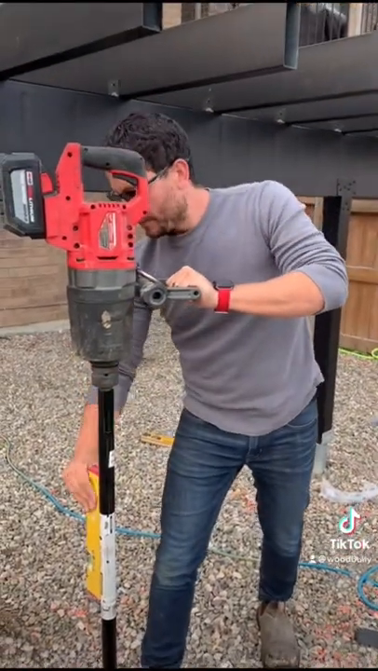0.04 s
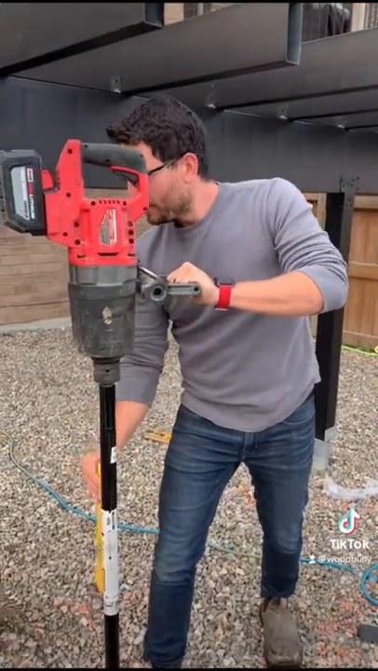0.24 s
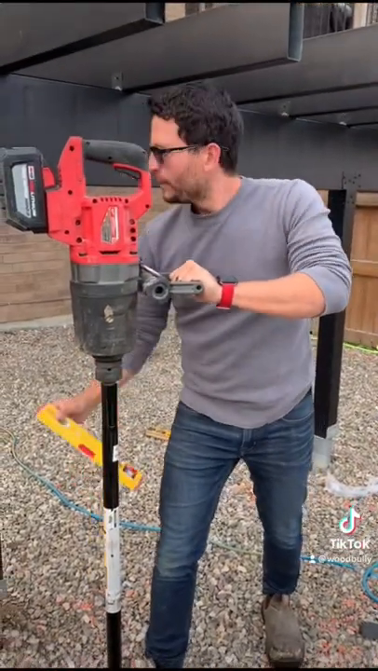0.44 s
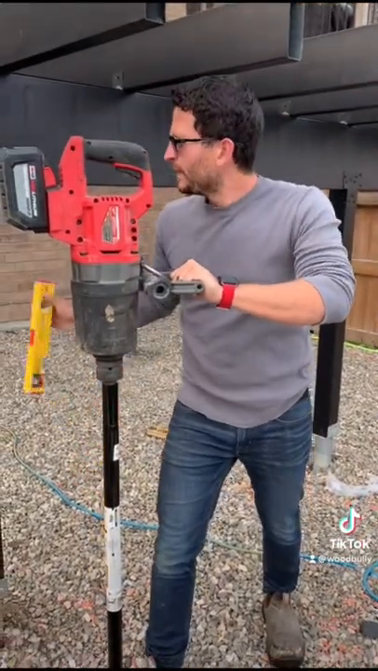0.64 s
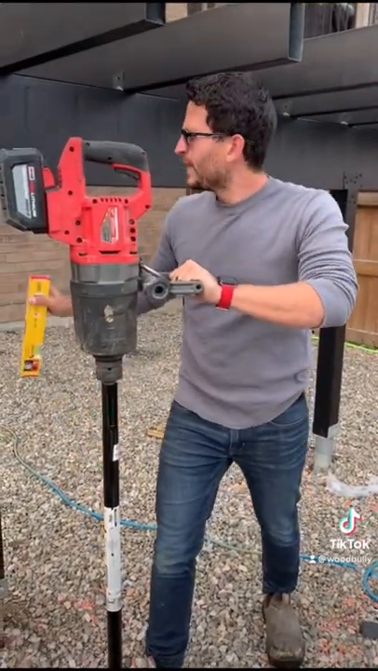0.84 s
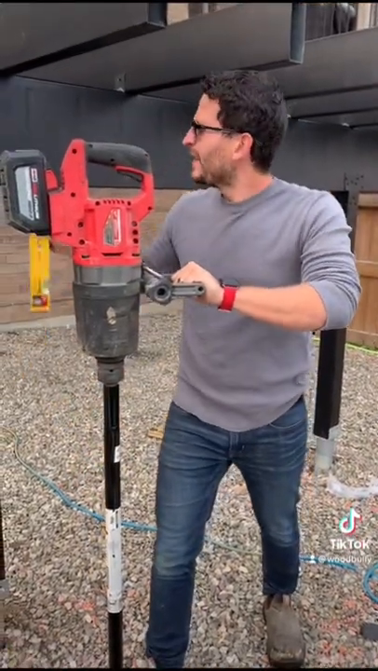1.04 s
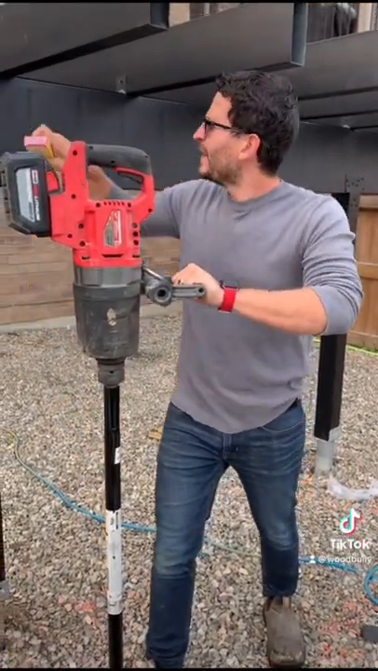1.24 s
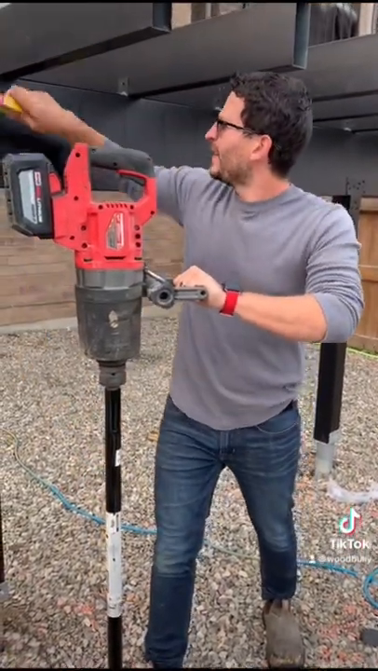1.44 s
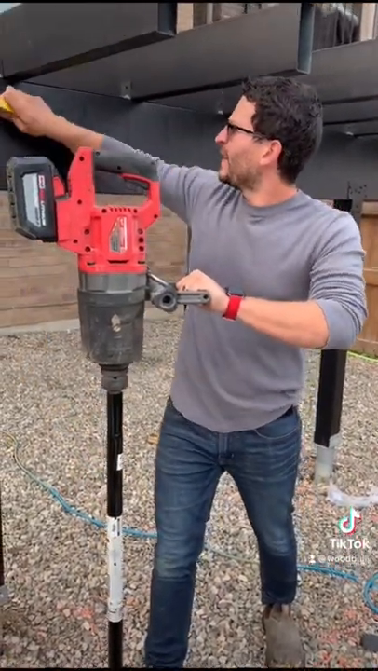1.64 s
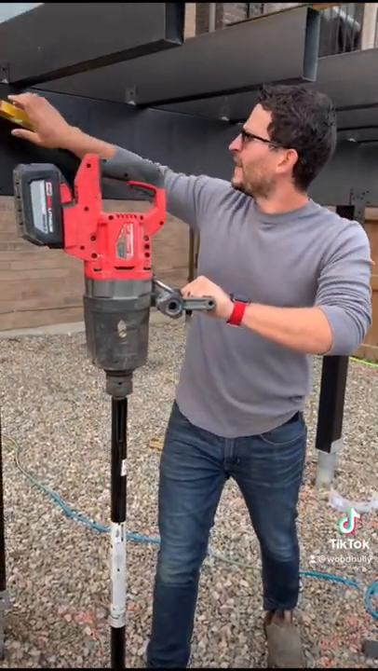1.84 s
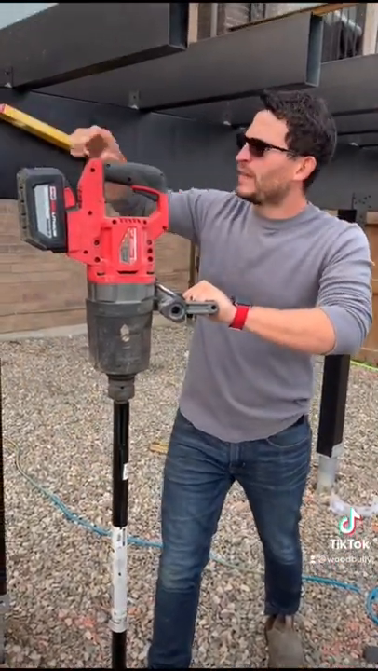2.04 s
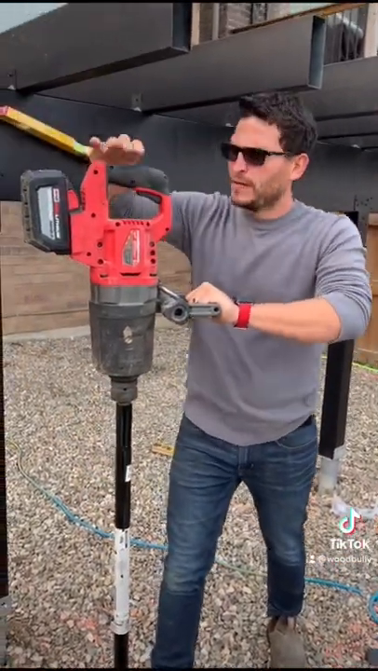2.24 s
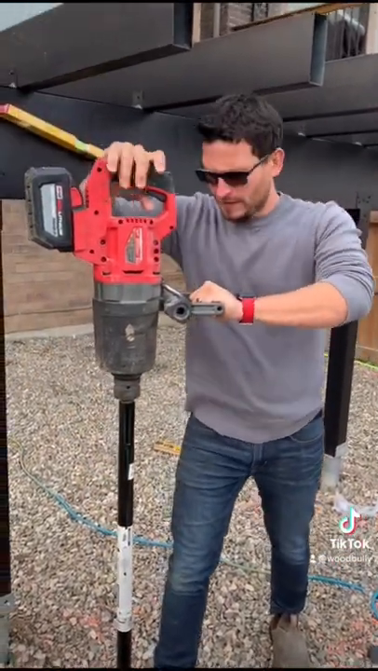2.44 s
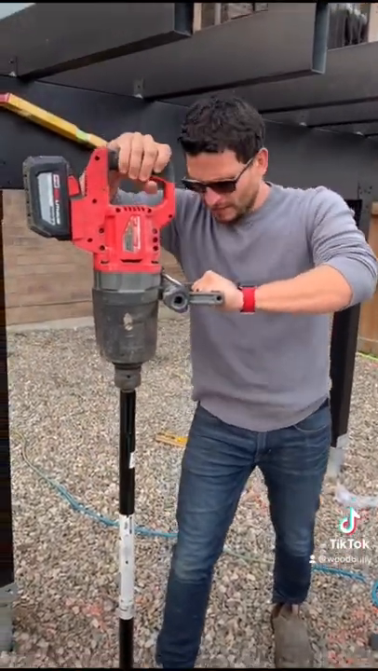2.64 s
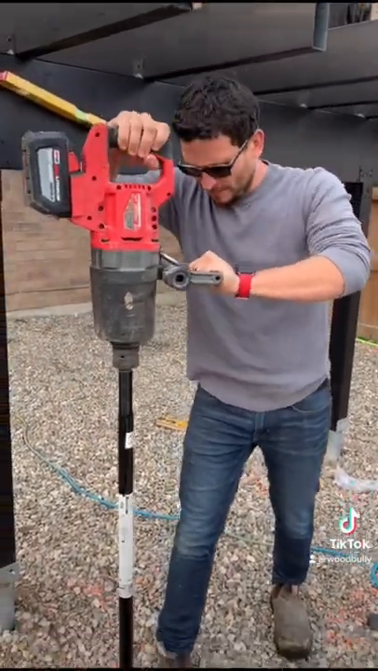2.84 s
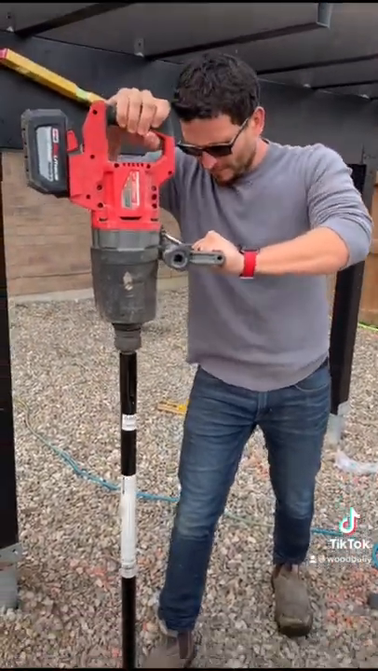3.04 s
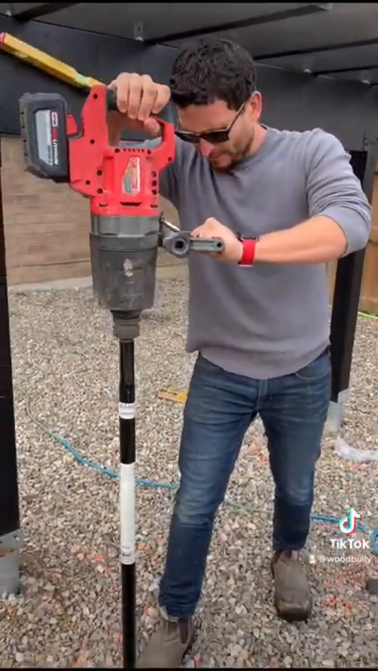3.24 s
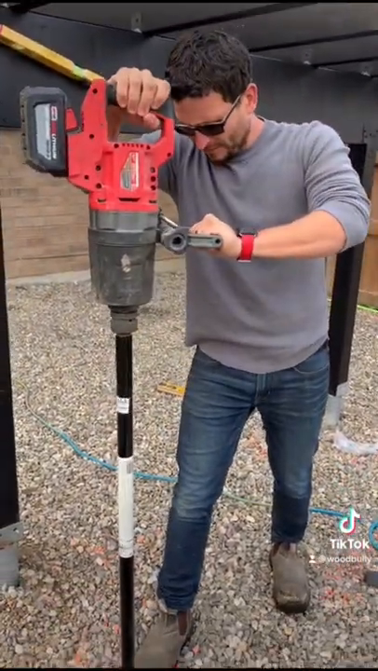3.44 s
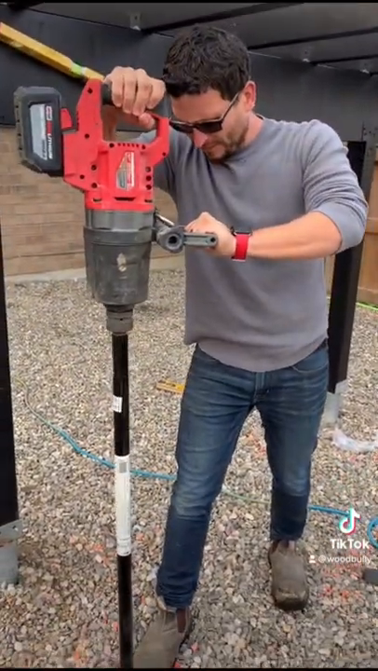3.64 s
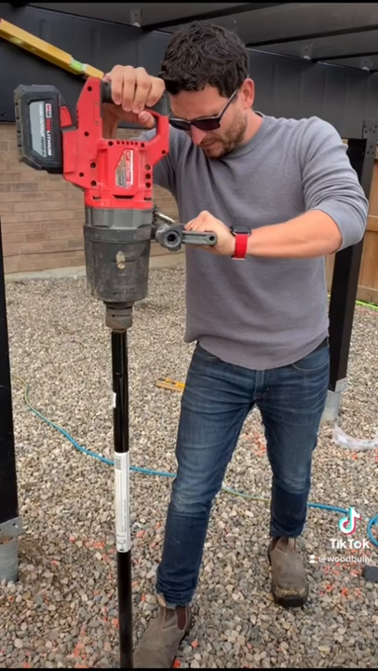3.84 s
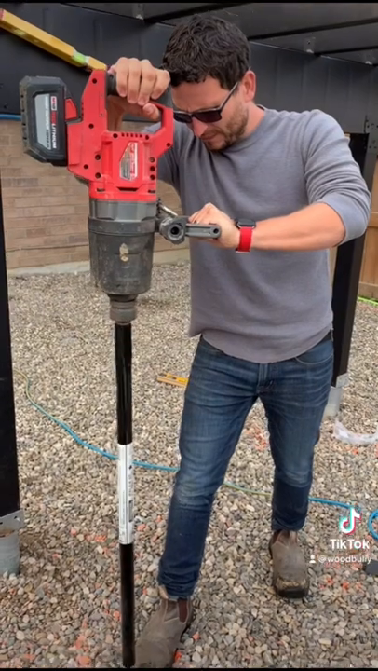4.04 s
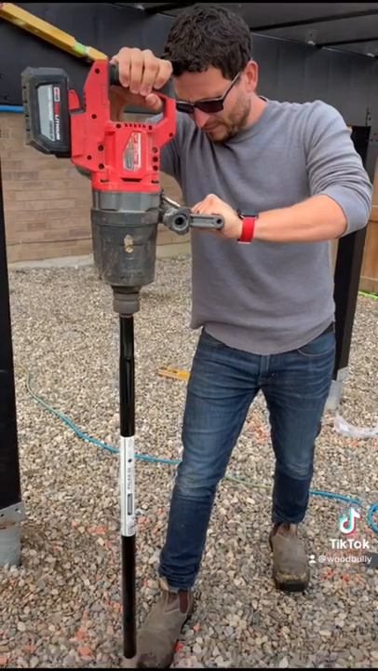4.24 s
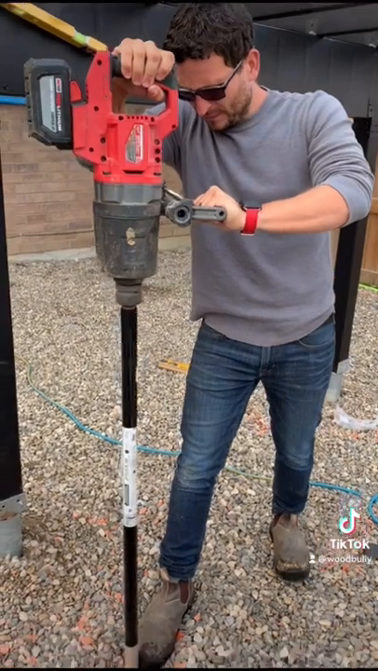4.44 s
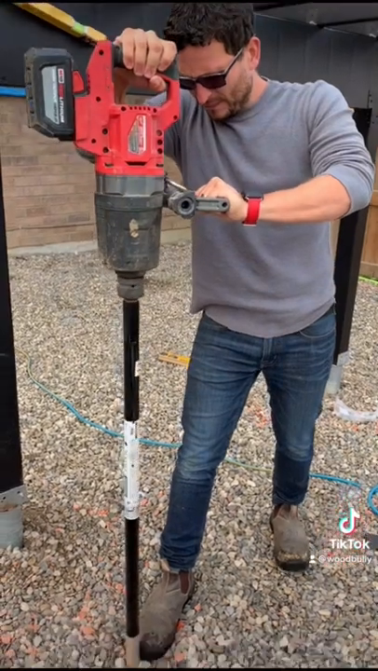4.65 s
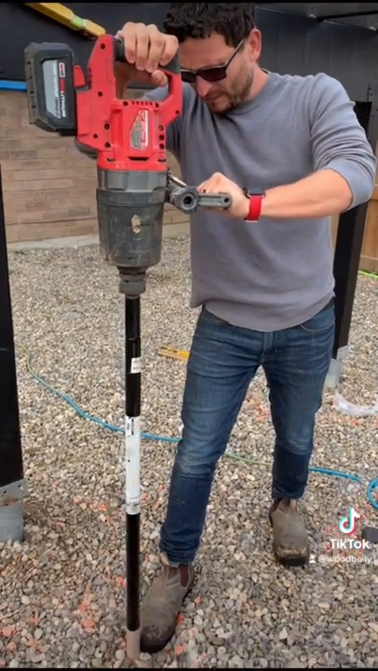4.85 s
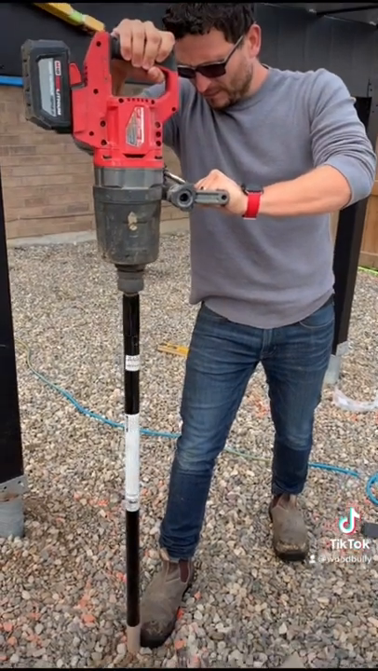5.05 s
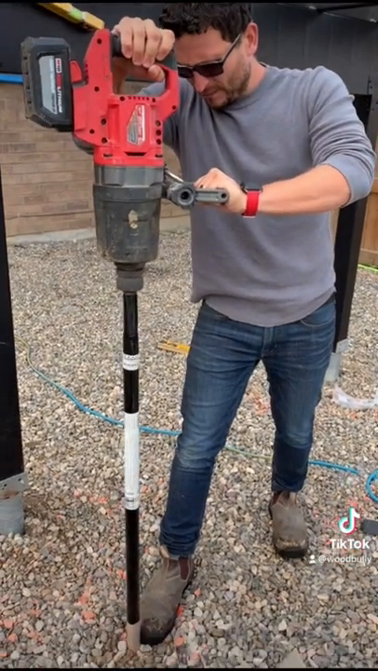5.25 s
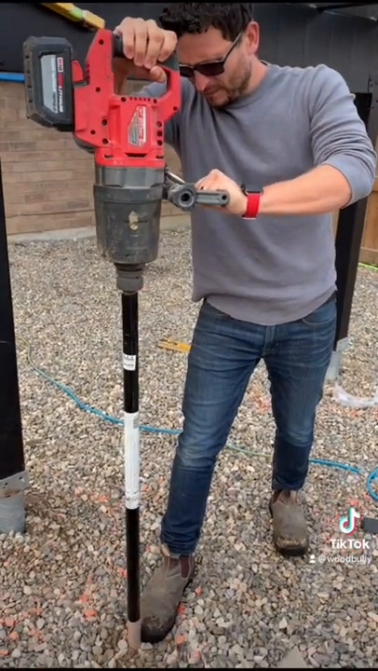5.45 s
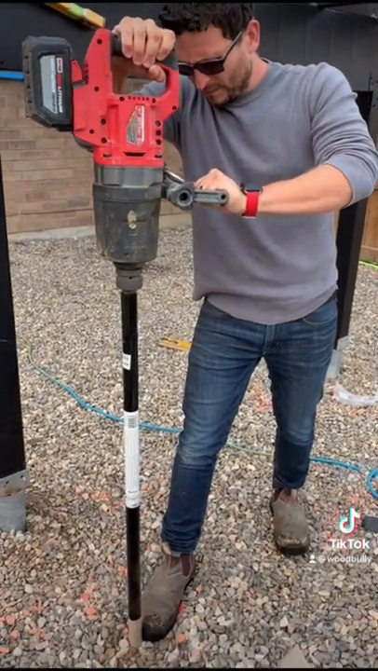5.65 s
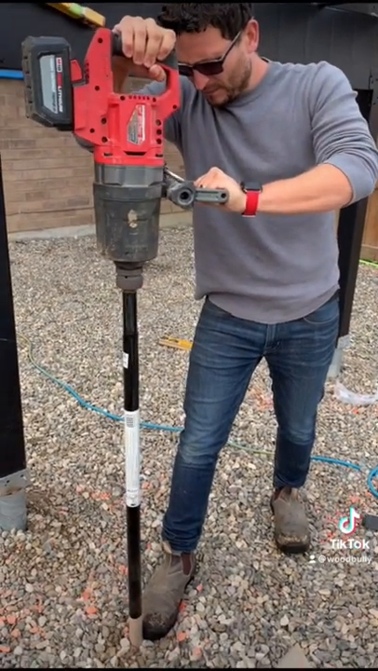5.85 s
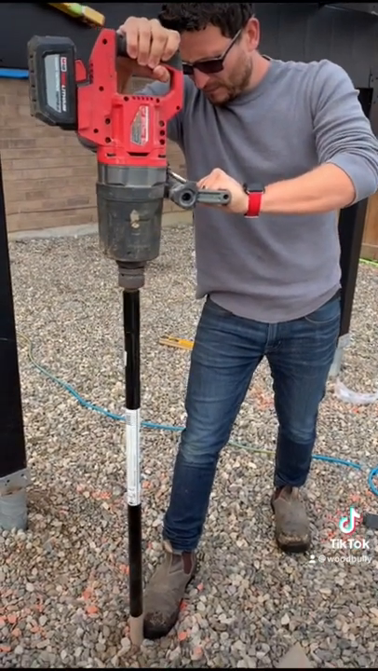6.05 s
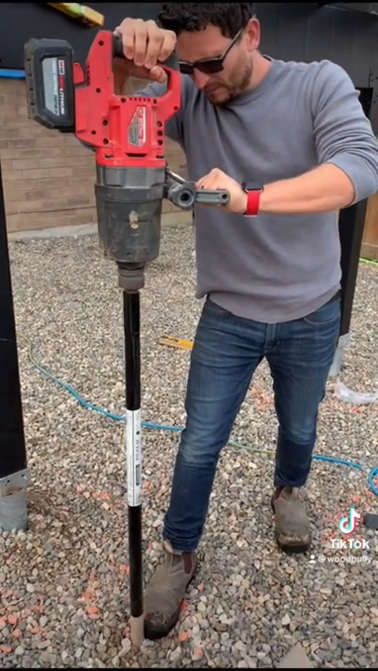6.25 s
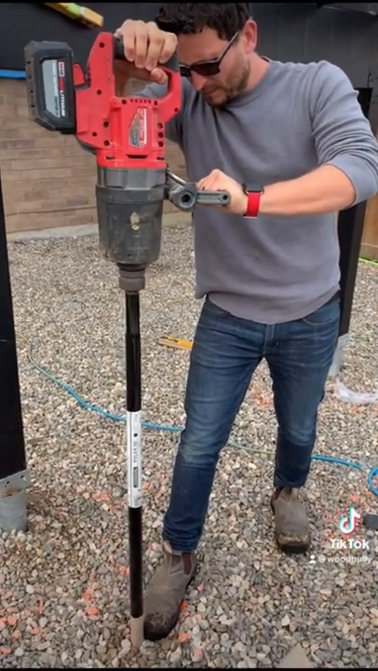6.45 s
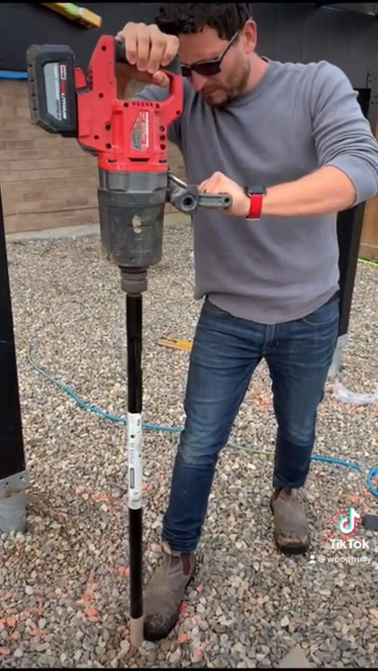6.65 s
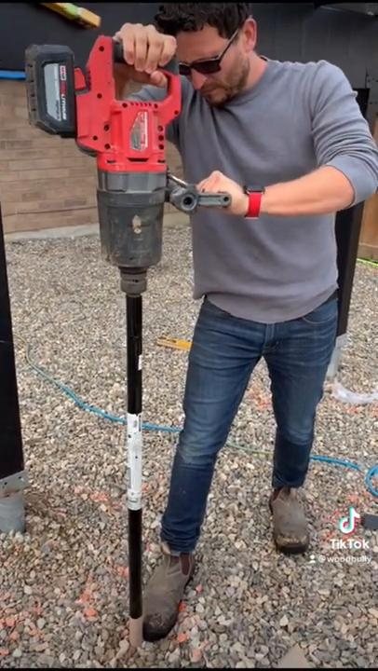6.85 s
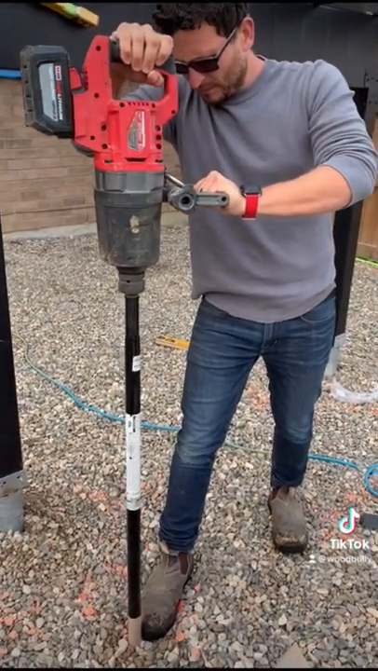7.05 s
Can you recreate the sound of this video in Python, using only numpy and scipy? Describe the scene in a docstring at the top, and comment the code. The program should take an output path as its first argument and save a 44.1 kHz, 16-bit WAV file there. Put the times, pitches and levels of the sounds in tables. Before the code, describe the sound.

In an open gravel yard under a steel deck, quiet rustle and small ticks come first. A magnetic level snaps onto the steel with a crack, clatter and long dark boom. About a second later a big cordless driver knocks its gears, whirrs briefly and hammers a steel pile in fast, even, ringing strokes to the end. Close stereo microphone, loud and bright, with short scattered echoes.

```python
"""Impact driver on a steel pile

A magnetic spirit level snaps onto an overhead steel deck, made of noise bursts, decaying bands and modes.
Then a big cordless impact driver spins up on swelling noise and hammers a pile into gravel, 13 strokes a second.
Each stroke is a catch, a main blow and four rebounds: noise bursts plus ringing pile modes and gliding thuds.
Handling ticks and rustle, scattered echoes of the hammering and a low outdoor rumble surround them."""
import sys
import numpy as np
from scipy import signal
from scipy.fft import rfft, irfft, next_fast_len
from scipy.io import wavfile
from scipy.ndimage import uniform_filter1d

SR = 44100
rng = np.random.default_rng(int(sys.argv[2]) if len(sys.argv) > 2 else 0)


def unload_wav(signal):
    """Save mono or channel-first audio to the path in sys.argv[1] as 16-bit WAV at rate SR, clipped to [-1, 1]."""
    wavfile.write(
        sys.argv[1],
        SR,
        np.round(np.clip(np.atleast_2d(signal).T, -1, 1) * 32767).astype(np.int16),
    )


N = 313282  # samples


def amp(db):
    """Decibels to gain."""
    return 10 ** (np.asarray(db) / 20)


def evened(x):
    """Scales to rms 1 over the whole array."""
    return x / np.sqrt(np.mean(x ** 2) + 1e-20)


def read(points, hz):
    """Reads a table on a log-frequency axis."""
    point_hz, value = np.transpose(points)
    return np.interp(np.log(hz + 1), np.log(point_hz + 1), value)


def level(rows):
    """A dB curve over time as a gain at every sample."""
    return amp(np.interp(np.arange(N) / SR, *np.transpose(rows)))


def add(mix, start_s, sound):
    """Adds a sound into the mix at start_s, cut at the end of the mix."""
    start = max(round(start_s * SR), 0)
    part = mix[:, start:][:, :sound.shape[-1]]
    part += sound[..., :part.shape[1]]


def fade(t, t60):
    """Exponential decay by 60 dB in t60 seconds."""
    return np.exp(-np.log(1000) * t / t60)


def ripple(width_hz, hz, count=1):
    """Random peaks and dips along frequency, about width_hz wide, rms 1."""
    size = max(round(width_hz / hz[1]), 1)
    smooth = uniform_filter1d(rng.standard_normal((count, 1, len(hz))), size)
    return evened(uniform_filter1d(smooth, size))


# Share of noise power common to both microphone ports. Each row: frequency in Hz, share from 0 to 1.
PORT_LIKENESS = [(150, .96), (800, .82), (2400, .72), (14000, .84)]


def noise(colour, size, count=1, modes_db=0, mode_hz=50, vary_db=0):
    """Coloured noises, count x 2 ports x size: dense modes shared by all, and a broad tint for each."""
    full = next_fast_len(size)
    hz = np.fft.rfftfreq(full, 1 / SR)
    z = rfft(rng.standard_normal((count, 3, full)))
    alike = np.clip(read(PORT_LIKENESS, hz), 0, 1)
    z = np.sqrt(alike) * z[:, :1] + np.sqrt(1 - alike) * z[:, 1:]
    modes = modes_db * ripple(mode_hz, hz)
    tint = vary_db * ripple(980, hz, count=count)
    db = read(colour, hz) + modes + tint
    return evened(irfft(z * amp(db), full)[..., :size])


def bursts(colour, rise, t60, tail_db, tail_t60, count=1, size=6000):
    """Steel on steel: countless modes start at once, die fast and leave a weaker tail."""
    t = np.arange(size) / SR
    decay = np.hypot(fade(t, t60), amp(tail_db) * fade(t, tail_t60))
    shape = (1 - np.exp(-t / rise)) * decay
    return noise(colour, size, count=count, modes_db=2.5, mode_hz=55.6, vary_db=1.9) * shape


# Outdoor rumble spectrum. Each row: frequency in Hz, relative level in dB per Hz.
RUMBLE_COLOUR = [(40, -14), (70, 2), (100, -5.5), (160, -3), (250, -24), (350, -24), (700, -35.5),
                 (1600, -38), (3000, -46), (4800, -53), (6500, -53), (15000, -72.5)]
# Outdoor rumble level. Each row: time in seconds, level in dB.
RUMBLE_LEVEL = [(0, -47), (.9, -47.5), (1.6, -44), (2.6, -43), (7.1, -50)]


def rumble():
    """Steady low-coloured noise whose level drifts slowly."""
    return level(RUMBLE_LEVEL) * noise(RUMBLE_COLOUR, N)[0]


# Light handling ticks. Each row: start in seconds, level in dB before a common 10.5 dB cut.
TICK_TIMES = [(0.3364, -56), (0.4883, -32), (0.7143, -36.5), (0.725, -41), (2.2874, -50), (2.488, -44),
              (2.6574, -46)]
# Spectrum of ticks and rustle. Each row: frequency in Hz, relative level in dB per Hz.
TICK_COLOUR = [(300, -4), (1500, -6), (3300, 1), (7000, -4), (11000, -12.5), (15000, -16.5)]
# Sleeve and hand rustle. Each row: time in seconds, level in dB.
RUSTLE_LEVEL = [(0, -73.5), (.6, -77), (1, -87.5), (2.7, -80)]


def ticks():
    """Sleeves rustle as continuous noise; hands, level and grip touch lightly in short bursts."""
    out = level(RUSTLE_LEVEL) * noise(TICK_COLOUR, N, modes_db=4.5, mode_hz=250)[0]
    touches = bursts(TICK_COLOUR, rise=0.00032, t60=0.026, tail_db=-16.0, tail_t60=0.21,
                     count=len(TICK_TIMES))
    for (start_s, db), touch in zip(TICK_TIMES, touches):
        add(out, start_s, amp(db - 10.5) * touch)
    return out


# Spectra of the deck's snap, clatter and boom. Each row: frequency in Hz, relative level in dB per Hz.
SNAP_COLOUR = [(50, -15.5), (170, -2), (300, 0), (700, -10), (1500, -4.5), (2600, -7.5), (4500, -21.5),
               (7000, -22), (10000, -18), (13000, -31.5), (15500, -46.5)]
CLATTER_COLOUR = [(80, -16.5), (200, -16), (600, 1), (1200, -11.5), (2300, 1.5), (4000, -12), (7000, -13.5),
                  (11000, -28), (15000, -44.5)]
BOOM_COLOUR = [(40, -39), (80, -9), (170, 4.5), (260, -3.5), (450, -1.5), (620, -8), (780, -8.5),
               (1000, -7), (1700, -12), (2600, -16.5), (4000, -24), (8000, -57)]
# Boom decay. Each row: frequency in Hz, t60 in seconds.
BOOM_DECAY = [(80, 3.1), (400, 4.47), (1000, 2.15), (1800, 1.7), (3000, 1.19), (6000, 0.34)]
# Deck modes. Each row: frequency in Hz, level in dB, t60 in seconds.
DECK_MODES = [(167, -24, 1.6), (317, -36, 2.6), (480, -31, 1.4), (566, -35, 2.0), (683, -41, 1.7),
              (851, -38, 1.8), (1653, -36, 2.0)]
DECK_START_S, HEAVE_HZ = 1.5283, 168


def deck():
    """The level's magnets snap on: a crack, a short heave of the sheet, clatter and a long dark boom."""
    size = 3 * SR
    t = np.arange(size) / SR
    snap = bursts(SNAP_COLOUR, rise=0.0003, t60=0.072, tail_db=-31, tail_t60=0.11, size=size)[0]
    heave = np.sin(2 * np.pi * HEAVE_HZ * t) * np.exp(-((t - .009) / 0.0056) ** 2)
    clatter = bursts(CLATTER_COLOUR, rise=0.0049, t60=0.26, tail_db=-23.5, tail_t60=.7, size=size)[0]
    impact = amp(-7) * snap + amp(-6.5) * heave + amp(-12.5) * clatter
    # each frequency band of the boom decays at its own rate
    steady = noise(BOOM_COLOUR, size, modes_db=3.0, mode_hz=17.0)[0]
    hz, s, z = signal.stft(steady, SR, nperseg=512)
    z = z * fade(s, read(BOOM_DECAY, hz)[:, None])
    boom = signal.istft(z, SR, nperseg=512)[1][:, :size]
    modes = sum(amp(db) * fade(t, t60) * np.sin(2 * np.pi * (mode_hz * t + rng.random()))
                for mode_hz, db, t60 in DECK_MODES)
    resonance = (amp(-22.5) * boom + modes) * (1 - np.exp(-t / 0.0042))
    mix = np.zeros((2, N))
    add(mix, DECK_START_S, impact + resonance)
    return mix


FIRST_BLOW_S = 2.808
CATCH_LEAD_S = .0163  # the hammer catches the anvil this long before each main blow
# Gears taking up their slack. Each row: start in seconds, level in dB.
GEAR_KNOCKS = [(2.7081, -24), (2.7262, -22)]


def spin_up(start_db, peak_db, bend, run_db, settle_s):
    """Gain of a gear noise: swells from the last knock to the first catch, then settles to run_db."""
    t = np.arange(N) / SR
    meshed_s, caught_s = GEAR_KNOCKS[-1][0], FIRST_BLOW_S - CATCH_LEAD_S
    progress = np.clip((t - meshed_s) / (caught_s - meshed_s), 0, 1)
    swell = start_db + (peak_db - start_db) * progress ** bend
    settle = (run_db - peak_db) * (1 - np.exp(-np.maximum(t - caught_s, 0) / settle_s))
    return amp(swell + settle) * (t >= meshed_s)


# Spectra of motor whirr and gear grind. Each row: frequency in Hz, relative level in dB per Hz.
WHIRR_COLOUR = [(300, -19), (1000, -17), (1400, 7.5), (2200, 4.5), (2700, -8), (3300, -15), (4500, -40),
                (9000, -41), (15000, -55)]
GRIND_COLOUR = [(50, -45), (90, -15), (200, -7.5), (310, -15.5), (550, 0.5), (780, 3), (1000, -2),
                (1350, -7.5), (2400, -2), (4000, -12), (8000, -13.5), (15000, -43.5)]
TRIGGER_S = 2.701
WHIRR_HIGH_RATIO, WHIRR_SAG_S = .25, .03
WHINE_HZ, WHINE_DB, WHINE_T60_S = 8000, -43.5, .5


def motor():
    """The drive whines, gears knock, whirr and grind; the hammer spring loads the motor and whirr sags."""
    t = np.arange(N) / SR
    since_knock = np.maximum(t - GEAR_KNOCKS[-1][0], 0)
    speed = 1 + WHIRR_HIGH_RATIO * np.exp(-since_knock / WHIRR_SAG_S) * (t > TRIGGER_S)
    position = np.cumsum(speed) % N
    whirr = np.array([np.interp(position, np.arange(N), port) for port in noise(WHIRR_COLOUR, N)[0]])
    grind = noise(GRIND_COLOUR, N)[0]
    out = spin_up(start_db=-28.5, peak_db=-20.5, bend=.4, run_db=-38.5, settle_s=.08) * whirr
    out += spin_up(start_db=-47, peak_db=-19, bend=1.6, run_db=-32.5, settle_s=.06) * grind
    since_trigger = np.maximum(t - TRIGGER_S, 0)
    whine_gain = amp(WHINE_DB) * (1 - np.exp(-since_trigger / .005)) * fade(since_trigger, WHINE_T60_S)
    wander_rad = 0.67 * evened(uniform_filter1d(rng.standard_normal(N), 120))
    out += whine_gain * np.sin(2 * np.pi * WHINE_HZ * t + wander_rad)
    for start_s, db in GEAR_KNOCKS:
        knock = bursts(WHIRR_COLOUR, rise=.0003, t60=0.014, tail_db=-9, tail_t60=0.137)[0]
        add(out, start_s, amp(db) * knock)
    return out


# Driver working against the gravel. Each row: time in seconds, strokes per second, main blow level in dB.
DRIVE_CURVE = [(2.81, 13.65, -12.5), (2.88, 12.84, -12.1), (3.04, 12.85, -12.0), (3.25, 13.07, -11.6),
               (3.6, 12.99, -13.1), (3.95, 13.18, -14.2), (4.6, 12.86, -13.2), (4.82, 13.22, -14.4),
               (5.25, 13.01, -12.9), (5.95, 13.45, -13.6), (6.15, 13.21, -15.9), (6.5, 13.22, -14.2),
               (7.0, 13.08, -13.6)]
ALTERNATE_DB, BLOW_SPREAD_DB = 0.27, 0.9  # strong and weak blows take turns, each a little uneven


def strokes():
    """One row per stroke, (main blow s, dB): the next follows one period of the hammer rate later."""
    s, rate, db = np.transpose(DRIVE_CURVE)
    times = [FIRST_BLOW_S]
    while times[-1] < N / SR:
        times.append(times[-1] + 1 / np.interp(times[-1], s, rate))
    times = np.array(times[:-1])
    alternate = ALTERNATE_DB * (-1) ** np.arange(len(times))
    uneven = alternate + BLOW_SPREAD_DB * rng.standard_normal(len(times))
    return np.transpose([times, np.interp(times, s, db) + uneven])


# Low thuds of each stroke. Each row: delay from the main blow in seconds, length in seconds,
# start pitch in Hz, pitch approached in Hz, glide time constant in seconds, mean level in dB.
THUD_GLIDES = [(-.0284, .031, 235, 60, .0105, -34.5), (.005, .021, 450, 62, .0052, -30),
               (.024, .016, 300, 170, .012, -38)]


def thuds(beats):
    """The pile flexes at every stroke; low bending waves travel slowest, so each thud falls in pitch."""
    out = np.zeros((2, N))
    for delay, length, start_hz, end_hz, glide, db in THUD_GLIDES:
        t = np.arange(0, length, 1 / SR)
        pitch_hz = end_hz + (start_hz - end_hz) * np.exp(-t / glide)
        turns = np.cumsum(pitch_hz) / SR
        thud = np.sin(2 * np.pi * turns) * signal.windows.tukey(len(t), .5)
        for (blow_s, _), loud in zip(beats, rng.standard_normal(len(beats))):
            add(out, blow_s + delay, amp(db + loud) * thud)
    return out


# Modes of pile and hammer case.
# Each row: frequency in Hz, relative level at a catch in dB, relative level at a blow in dB, t60 in seconds.
PILE_MODES = [(551, -7.5, -13.5, 0.038), (768, -11, -19.5, 0.048), (931, -15, -15, 0.044),
              (1100, -8.5, -24, 0.043), (1270, -21.5, -4, 0.021), (1338, -7.5, -8.5, 0.022),
              (1439, -9, -26.5, 0.07), (1720, -11, -17, 0.044), (1918, -13, -11.5, 0.029),
              (2320, -37, -23.5, 0.18), (3677, -12.5, -10.5, .035), (3777, -14, -12, 0.039),
              (5538, -5.5, -8, 0.021), (5840, -29, -7.5, 0.018), (7010, -23, -26, 0.16),
              (7380, -41, -18.5, 0.055)]


def rings(axis, count, spread_db, jitter_s, size=6000):
    """Pile modes after each clack; the contact varies, so high modes never start alike."""
    modes, t = np.array(PILE_MODES), np.arange(size) / SR
    loud, late = rng.standard_normal((2, count, len(modes)))
    phase = 2 * np.pi * modes[:, 0] * jitter_s * late
    start = amp(modes[:, axis] + spread_db * loud) * np.exp(1j * phase)
    decay = fade(t, modes[:, 3:]) * (1 - np.exp(-t / 0.00066))
    waves = np.exp(2j * np.pi * modes[:, :1] * t) * decay
    return (start @ waves).imag[:, None]


# Spectra of catch, blow and a blow's bright first instant.
# Each row: frequency in Hz, relative level in dB per Hz.
CATCH_COLOUR = [(200, -24.5), (350, -26), (520, -13), (1100, -7), (1600, -11.5), (2800, -12), (3800, -9),
                (4600, -21.5), (6500, -14.5), (8500, -18), (10000, -23.5), (12500, -24), (15500, -34)]
BLOW_COLOUR = [(200, -30), (320, -22.5), (550, -8.5), (900, -11.5), (1280, -3.5), (1600, -9.5),
               (2000, -8.5), (3000, -11.5), (5500, -13), (6500, -13), (8500, -19.5), (11000, -17.5),
               (15500, -34)]
CRACK_COLOUR = [(1000, -21), (3000, -41), (5600, 3), (11000, -4), (15500, -10)]
# Rebounds. Each row: mean delay after the main blow in seconds, mean level in dB against the blow,
# t60 in seconds, delay scatter in seconds.
REBOUND_CLACKS = [(.0088, -5.5, 0.027, .0009), (0.0196, -5.5, 0.028, .0005), (0.0256, -14.5, .03, .001),
                  (.0395, -19.5, 0.045, 0.001)]
# the catch bites hardest until the pile starts to turn freely
BITE_DB, TURNING_DB, BREAKAWAY_S, CATCH_SPREAD_DB = -11.5, -16, 3.3, 0.93
CRACK_SPREAD_DB = 1.6  # a square hit cracks more brightly than a glancing one


def hammer(beats):
    """The hammer catches the anvil, strikes it hard, and rattles off in smaller rebounds."""
    out, count = np.zeros((2, N)), len(beats)
    catches = amp(3.0) * bursts(CATCH_COLOUR, rise=0.0013, t60=0.031, tail_db=-4.5, tail_t60=0.074,
                                count=count)
    catches += amp(2.5) * rings(axis=1, count=count, spread_db=2.5, jitter_s=.00008)
    blows = amp(5.0) * bursts(BLOW_COLOUR, rise=0.001, t60=0.02, tail_db=-6.5, tail_t60=0.064, count=count)
    square_db = CRACK_SPREAD_DB * rng.uniform(-np.sqrt(3), np.sqrt(3), (count, 1, 1))
    cracks = bursts(CRACK_COLOUR, rise=0.00041, t60=0.006, tail_db=-28, tail_t60=.03, count=count)
    blows += amp(7 + square_db) * cracks
    blows += amp(3.5) * rings(axis=2, count=count, spread_db=3.0, jitter_s=.00009)
    for (blow_s, blow_db), catch, blow, loud in zip(beats, catches, blows, rng.standard_normal(count)):
        mean_db = BITE_DB if blow_s < BREAKAWAY_S else TURNING_DB
        add(out, blow_s - CATCH_LEAD_S, amp(mean_db + CATCH_SPREAD_DB * loud) * catch)
        add(out, blow_s, amp(blow_db) * blow)
    for delay, db, t60, scatter in REBOUND_CLACKS:
        clacks = bursts(BLOW_COLOUR, rise=0.00054, t60=t60, tail_db=-22, tail_t60=.07, count=count)
        clacks += amp(0.5) * rings(axis=2, count=count, spread_db=4.0, jitter_s=0.00013)
        for (blow_s, blow_db), clack, (late, loud) in zip(beats, clacks, rng.standard_normal((count, 2))):
            add(out, blow_s + delay + scatter * late, amp(blow_db + db + 1.8 * loud) * clack)
    return out


def yard(x, t60, size=22050):
    """Deck, wall and fence scatter the sound back, duller and a little later: a decaying noise tail."""
    t = np.arange(size) / SR
    colour = [(100, -19), (600, -4.5), (2000, -3.5), (7000, -8.5), (15000, -16)]  # Hz, dB per Hz
    tail = noise(colour, size)[0] * fade(t, t60) * (1 - np.exp(-t / 0.0094))
    return signal.fftconvolve(x, tail / np.linalg.norm(tail[0]), axes=1)[:, :N]


def scene():
    """Rumble, ticks, deck, motor and pile thuds, and the hammering with its echoes."""
    beats = strokes()
    tool = hammer(beats)
    echoes = amp(-21.5) * yard(tool, t60=0.25)
    return rumble() + ticks() + deck() + motor() + thuds(beats) + echoes + tool


# Phase between the two microphone ports. Each row: frequency in Hz, lead of left over right in radians.
PORT_LEAD = [(0, 0), (300, -.25), (850, .7), (1100, -.35), (2000, 0), (2350, 1.4), (3900, 1.45),
             (4700, 3.14), (15400, 18.85)]
BASS_HZ, EDGE_HZ = 46, 16050


def record(dry):
    """The right port is phase-shifted; the microphone sheds deep bass; peaks clip; then the band limit."""
    size = next_fast_len(N + 2000)
    hz = np.fft.rfftfreq(size, 1 / SR)
    lag = np.interp(hz, *np.transpose(PORT_LEAD))
    z = rfft(dry, size) * hz ** 4 / np.hypot(hz ** 4, BASS_HZ ** 4)
    ports = irfft(z * [np.ones(len(hz)), np.exp(-1j * lag)], size)[:, :N]
    held = np.clip(ports, -1, 1)
    lowpass = signal.firwin(511, EDGE_HZ, window=("kaiser", 9), fs=SR)
    return signal.oaconvolve(held, lowpass[None], "same")


dry = scene()
out = record(dry)
unload_wav(out)
```